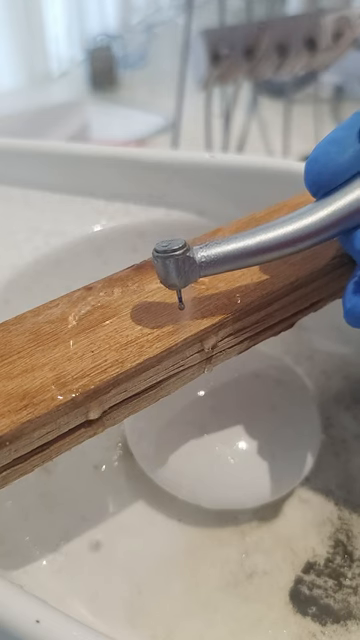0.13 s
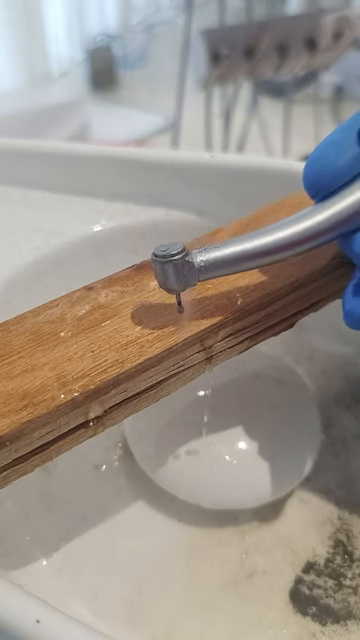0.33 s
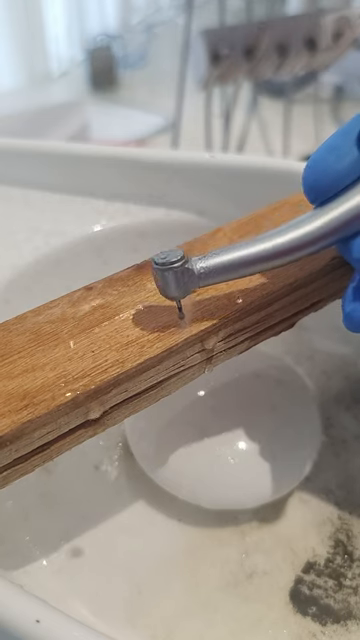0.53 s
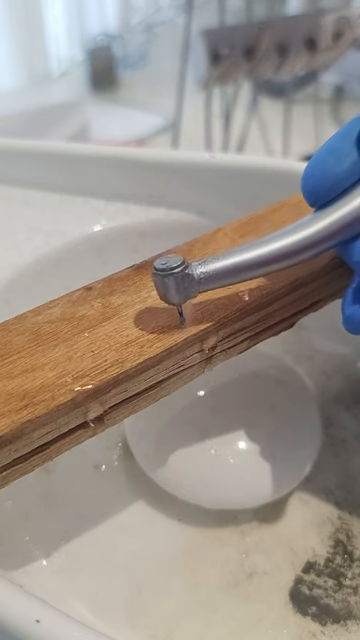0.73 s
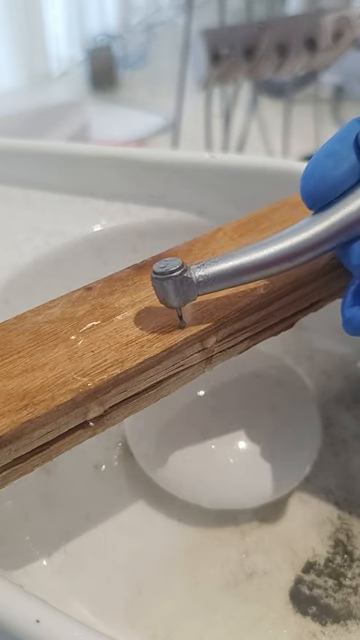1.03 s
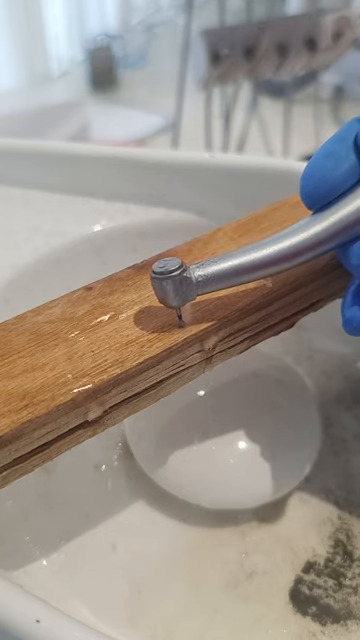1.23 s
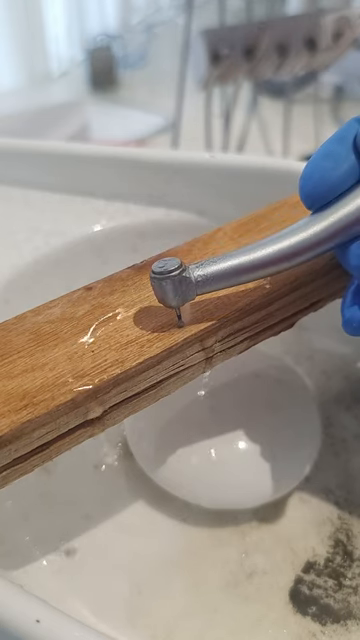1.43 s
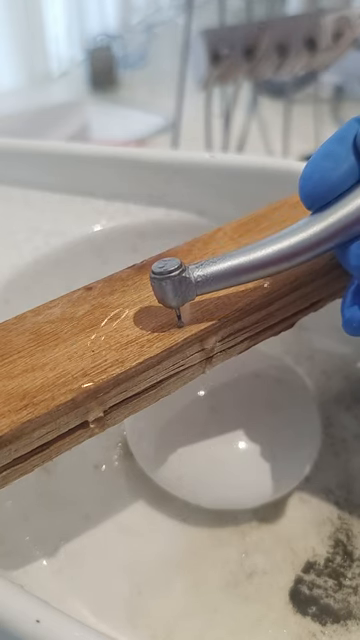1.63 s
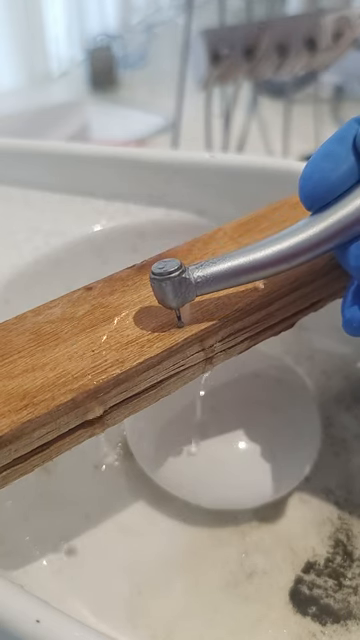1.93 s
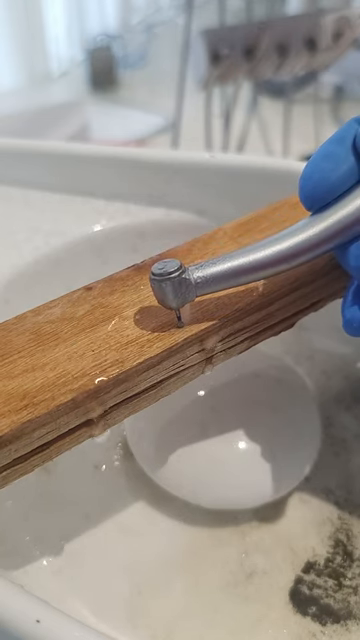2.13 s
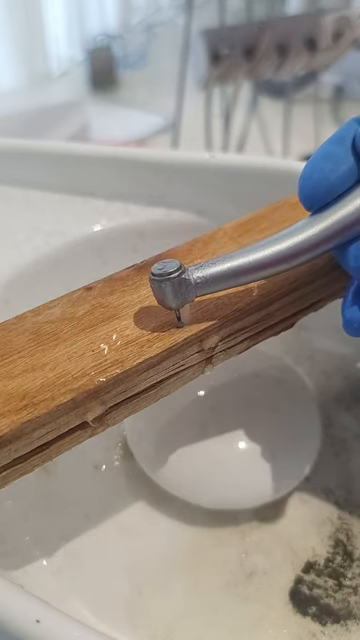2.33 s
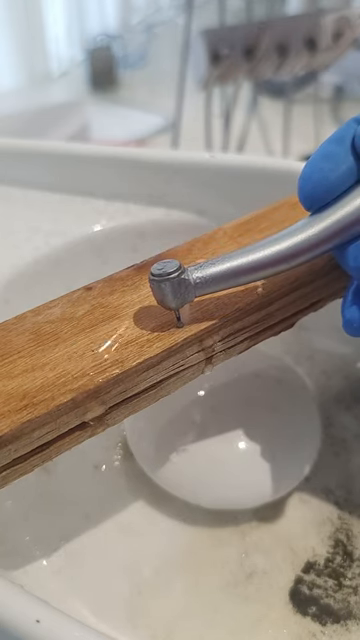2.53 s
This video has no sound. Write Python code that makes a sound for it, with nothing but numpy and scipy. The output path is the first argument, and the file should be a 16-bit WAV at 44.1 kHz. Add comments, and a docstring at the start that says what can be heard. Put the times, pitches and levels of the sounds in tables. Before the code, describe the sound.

A dental drill whines piercingly at a steady high pitch over bright, constant air and water spray hiss. From about 1 second it presses into wet wood and the whine slides down, fastest from 1.3 to 2.3, wavering between left and right. Thin squeals appear around 2.0-2.4, then the lower whine keeps sinking slowly. A compressor hums faintly throughout; a soft low bump lands left near 2.6.

```python
"""Dental handpiece cutting wet wood

An air turbine whines close to an upright phone and slows as its bur sinks into wet wood: gliding sines
follow the shaft and its ball cages, and two more squeal briefly in the cut. Air and water spray hiss as
shaped noise, a piston compressor hums across the room in crank harmonics, and a soft low bump sounds late.
The two microphone ports face different ways and colour the treble very differently."""
import sys
import numpy as np
from scipy import signal
from scipy.fft import rfft, irfft, next_fast_len
from scipy.io import wavfile
from scipy.ndimage import uniform_filter1d, map_coordinates

SR = 44100
rng = np.random.default_rng(int(sys.argv[2]) if len(sys.argv) > 2 else 0)


def wav_out(sig):
    """Save sig, one row per channel (or a flat mono array), as 16-bit PCM at SR to the path in sys.argv[1]."""
    wavfile.write(sys.argv[1], SR, np.round(np.clip(np.atleast_2d(sig).T, -1, 1) * 32767).astype(np.int16))


def volts(x):
    """Linear amplitude factor 10**(x/20) for a level x in dB, scalar or array-like."""
    e = np.asarray(x, float) / 20
    return 10 ** e


N = 118629  # samples, 2.69 s

# How the two ports relate: (frequency [Hz], likeness [0-1], phase lag of the right port [rad])
PORTS = [(60, .6, 0), (900, .4, 0), (1200, .75, 1), (1900, .35, .6), (2300, .7, 2), (2650, .1, 1.5),
         (2900, .4, 4.5), (3800, .6, 3.8), (4400, .05, 4.8), (4620, .03, 3.7), (4880, .03, 3.2),
         (6400, .03, 1.6)]


def slow(rate):
    """Band-limited randomness: a smooth curve through normal random knots, rate of them a second."""
    knots = rng.standard_normal(int(N * rate / SR) + 4)
    return map_coordinates(knots, [np.arange(N) * rate / SR])


def curves(rows):
    """Linear interpolation in time: one value per sample for each column after the time."""
    times, *columns = np.transpose(rows)
    return [np.interp(np.arange(N) / SR, times, column) for column in columns]


def on_hz(rows, hz):
    """Interpolation on a logarithmic frequency axis: the columns after the frequency, read at hz."""
    table_hz, *columns = np.transpose(rows)
    return [np.interp(np.log(hz + 1), np.log(table_hz + 1), column) for column in columns]


def tone(hz, left_db, right_db, smear_hz, flicker_db):
    """Phase is the integral of frequency: a sine of wandering pitch and level, lagging at the right port."""
    phase = 2 * np.pi * np.cumsum(hz + smear_hz * slow(90)) / SR
    lag = on_hz(PORTS, hz)[1]
    left = volts(left_db) * np.sin(phase)
    right = volts(right_db) * np.sin(phase - lag)
    flicker = volts(flicker_db * slow(40))
    return np.sqrt(2) * flicker * np.array([left, right])  # levels are rms


def port_levels(louder_db, pan_db):
    """Level difference between ports: the louder keeps its level, the other drops by the size of pan_db."""
    return louder_db + np.minimum(pan_db, 0), louder_db - np.maximum(pan_db, 0)


def turbine():
    """Rotating unbalance radiates at shaft speed and its octave; the ball cages turn at a share of it."""
    # Shaft: (time [s], speed [Hz], left whine [dB], right whine [dB], octave at the louder port [dB])
    shaft = [(.1, 7535, -23, -48, -48), (.6, 7533, -29, -43, -48), (.95, 7529, -23, -42, -45),
             (1.07, 7508, -22, -37, -48), (1.15, 7470, -33, -37, -48), (1.31, 7293, -24, -48, -39),
             (1.39, 7150, -21, -38, -26), (1.48, 6935, -33, -27, -42), (1.54, 6770, -24, -30, -26),
             (1.59, 6660, -24, -40, -38), (1.7, 6415, -26, -26, -24), (1.83, 6150, -44, -28, -36),
             (1.92, 5930, -36, -24, -22), (2.02, 5630, -46, -29, -42), (2.085, 5450, -36, -24, -28),
             (2.14, 5220, -44, -37, -30), (2.21, 5045, -44, -32, -29), (2.29, 4880, -29, -25, -40),
             (2.42, 4745, -25, -27, -30), (2.69, 4460, -25, -25, -28)]
    # Directivity of the octave: (frequency [Hz], left minus right [dB])
    octave_pan = [(13000, 28), (13500, -20), (14300, 3)]
    hz, left_db, right_db, octave_db = curves(shaft)
    pan_db, = on_hz(octave_pan, hz * 2)
    whine = tone(hz, left_db, right_db, smear_hz=3, flicker_db=1.2)
    octave = tone(hz * 2, *port_levels(octave_db, pan_db), smear_hz=6, flicker_db=1.2)
    return whine + octave + front_cage(hz) + rear_cage(hz)


def front_cage(shaft_hz):
    """Pure rolling: the front bearing cage turns at a fixed share of the shaft speed."""
    # Front cage level: (time [s], left [dB], right [dB])
    front_levels = [(.97, -38, -52), (1.04, -52, -40), (1.12, -56, -54), (1.42, -47, -41), (1.52, -70, -70)]
    return tone(shaft_hz * .4015, *curves(front_levels), smear_hz=3, flicker_db=3)


def rear_cage(shaft_hz):
    """Rolling with slip: the rear bearing cage lags until the cut loads it, so its share changes."""
    # Rear cage: (time [s], share of shaft speed, level at the louder port [dB])
    rear_course = [(.95, .3535, -46), (1.13, .364, -41), (1.14, .381, -39), (1.28, .391, -35),
                   (1.55, .389, -43), (1.9, .392, -38), (2.05, .4, -41), (2.12, .395, -50),
                   (2.69, .398, -50)]
    # Directivity of the rear cage: (frequency [Hz], left minus right [dB])
    rear_pan = [(1850, 2), (2400, -2), (2650, -10)]
    share, louder_db = curves(rear_course)
    hz = shaft_hz * share
    pan_db, = on_hz(rear_pan, hz)
    return tone(hz, *port_levels(louder_db, pan_db), smear_hz=13, flicker_db=3)


def squeals():
    """Friction-driven oscillation: two thin wavering tones while the bur binds in the wood."""
    # High squeal: (time [s], frequency [Hz], left level [dB])
    high_squeal = [(2.03, 12780, -33), (2.1, 12680, -30), (2.18, 12580, -29), (2.2, 12620, -37),
                   (2.215, 12670, -27), (2.41, 12720, -31)]
    # Low squeal: (time [s], frequency [Hz], left level [dB])
    low_squeal = [(2.105, 3080, -34), (2.135, 3110, -45), (2.165, 3060, -36), (2.2, 3200, -40),
                  (2.28, 3220, -38)]
    out = 0
    for rows, left_minus_right_db in ((high_squeal, 25), (low_squeal, .5)):
        # each squeal rises from silence and returns to it within 20 ms
        before = (rows[0][0] - .02, rows[0][1], -120)
        after = (rows[-1][0] + .02, rows[-1][1], -120)
        hz, left_db = curves([before, *rows, after])
        out = out + tone(hz, left_db, left_db - left_minus_right_db, smear_hz=15, flicker_db=1.5)
    return out


def spray(patchy_db=1.1, flutter_db=.3):
    """Turbulence as shaped, partly coherent noise; its colour shifts as the bur enters the wood."""
    # Hiss density: (frequency [Hz], free left, free right, cutting left, cutting right [dB per Hz])
    hiss_density = [(250, -78, -76, -78, -76), (600, -82, -84, -84, -85), (950, -80, -75, -82, -78),
                    (1300, -71, -76, -75, -79), (1900, -80, -76, -79, -80), (2300, -72, -68, -74, -70),
                    (2600, -75, -65, -78, -72), (3000, -65, -63, -67, -65), (3380, -77, -74, -76, -78),
                    (3750, -67, -64, -67, -65), (4050, -77, -75, -78, -78), (4400, -68, -64, -70, -65),
                    (6500, -66, -64, -68, -64), (7000, -64, -69, -60, -82), (7600, -54, -86, -55, -86),
                    (8200, -49, -84, -51, -85), (8900, -56, -78, -58, -80), (9500, -55, -72, -53, -75),
                    (10600, -57, -69, -58, -70), (11900, -53, -73, -55, -76), (12900, -58, -75, -58, -75),
                    (13300, -59, -65, -58, -65), (15700, -63, -64, -63, -64)]
    cut_from_s, cut_full_s = .9, 1.7
    hz, t, noise = signal.stft(rng.standard_normal((2, N)), SR, nperseg=1024)
    # the right port hears a lagged share of the left port's noise and fills up with its own
    like, lag = on_hz(PORTS, hz)
    like = np.clip(like, 0, 1)[:, None]
    shared = like * np.exp(-1j * lag)[:, None] * noise[0]
    own = np.sqrt(1 - like ** 2) * noise[1]
    ports = np.array([noise[0], shared + own])
    # random patches, smoothed over frequency and then time
    patches = uniform_filter1d(rng.standard_normal(ports.shape), size=9, axis=1)
    patches = uniform_filter1d(patches, size=5, axis=2)
    density_db = np.array(on_hz(hiss_density, hz))[:, :, None]
    cut = np.clip((t - cut_from_s) / (cut_full_s - cut_from_s), 0, 1)
    colour_db = density_db[:2] * (1 - cut) + density_db[2:] * cut
    gain = volts(colour_db + patchy_db * patches / patches.std())
    hiss = signal.istft(ports * gain, SR, nperseg=1024)[1][:, :N]
    hiss = hiss * np.sqrt(SR / 2)  # unit noise power to unit power per Hz
    return hiss * volts(flutter_db * slow(60))


def compressor():
    """Harmonic series of a periodic machine: steady multiples of the crank speed swell together."""
    # Hum: (multiple of the crank speed, mean level of the two ports in dB [dB])
    hum_partials = [(2, -54), (4, -37), (5, -58), (6, -60), (8, -52), (9, -61), (13, -64)]
    crank_hz, swell_db, swell_period_s, left_minus_right_db = 22.305, 1.1, .52, -2
    t = np.arange(N) / SR
    swell = volts(swell_db * np.cos(2 * np.pi * t / swell_period_s))
    hum = 0
    for multiple, level_db in hum_partials:
        turns = round(multiple) * crank_hz * t + rng.random()
        hum = hum + np.sqrt(2) * volts(level_db) * np.sin(2 * np.pi * turns)
    return hum * swell * volts(np.array([[.5], [-.5]]) * left_minus_right_db)


def thud():
    """Damped free vibration: one soft low bump of three partials that only the left port catches."""
    start_s, start_db, t60_s, rise_s = 2.602, -17, .11, .012  # start_db: each partial's decay, before the rise
    t = np.clip(np.arange(N) / SR - start_s, 0, None)
    decay = volts(start_db - 60 * t / t60_s)
    rise = (1 - np.exp(-t / rise_s)) ** 2
    swing = decay * rise * sum(np.sin(2 * np.pi * hz * t) for hz in (60, 120, 205))
    return np.array([swing, np.zeros(N)])


def scene():
    """Superposition of the handpiece, its spray, the room machinery and the bump."""
    return turbine() + squeals() + spray() + compressor() + thud()


def roll_off(x):
    """The treble ends steeply here."""
    return signal.sosfilt(signal.butter(12, 17090, fs=SR, output="sos"), x)


def record(dry):
    """Band limiting and gating: the phone cuts the top, then fades in after a short silence."""
    opens_s, fade_s, top_hz = .034, .012, 15750
    size = next_fast_len(N + 8192)
    passed = np.fft.rfftfreq(size, 1 / SR) < top_hz
    limited = irfft(rfft(dry, size) * passed, size)[:, :N]
    opening = np.clip((np.arange(N) / SR - opens_s) / fade_s, 0, 1)
    fade = np.sin(np.pi / 2 * opening) ** 2
    return roll_off(limited * fade)


dry = scene()
out = record(dry)
wav_out(out)
```